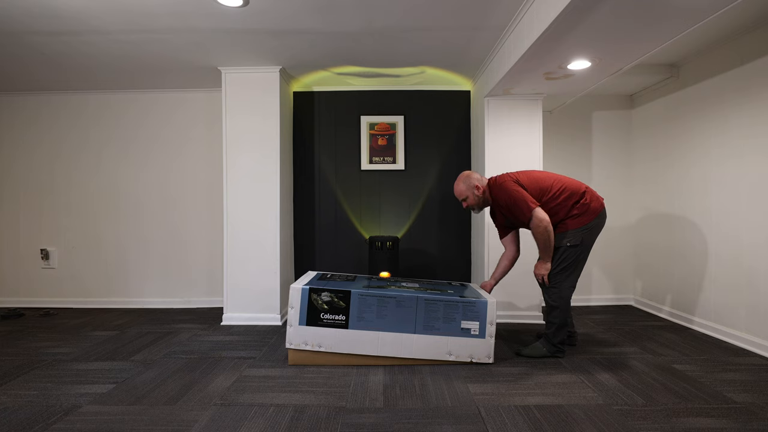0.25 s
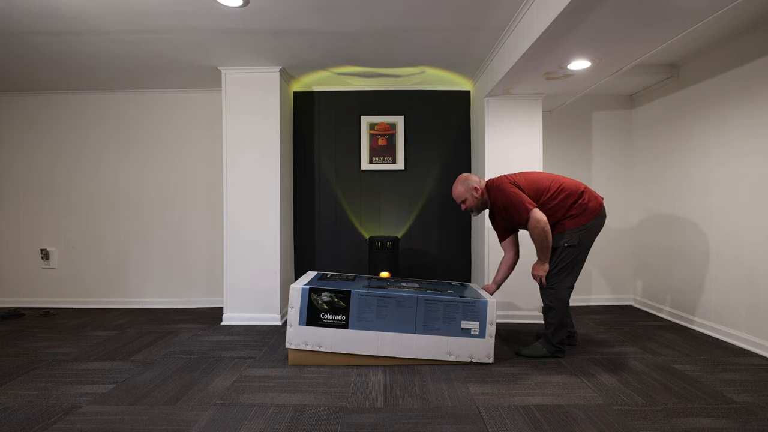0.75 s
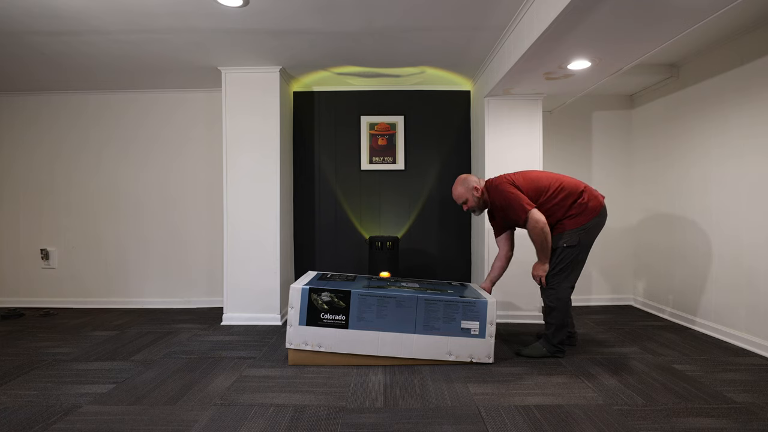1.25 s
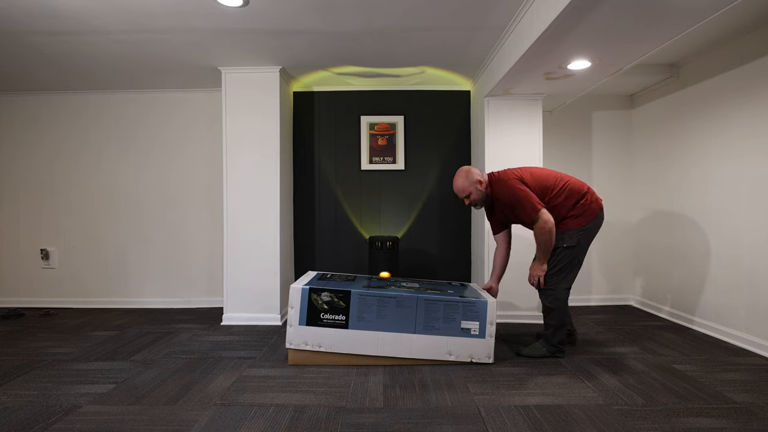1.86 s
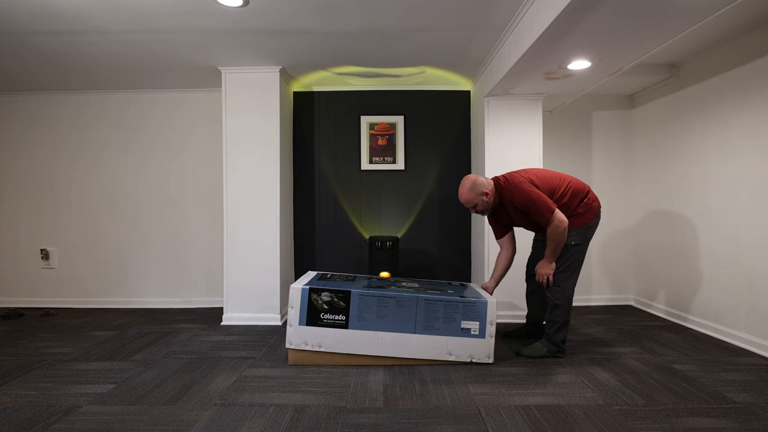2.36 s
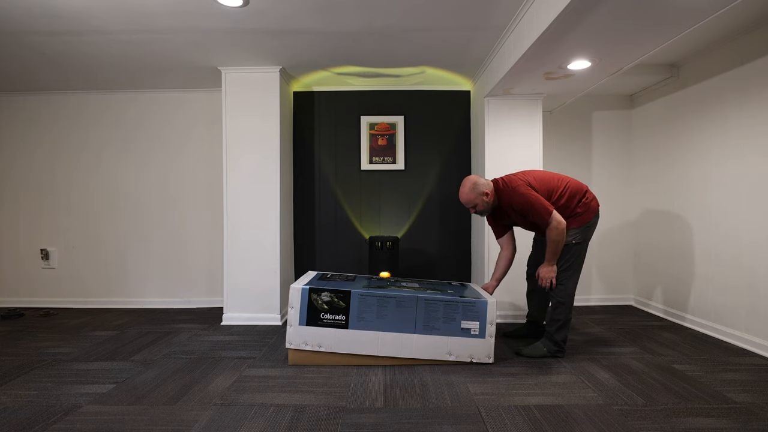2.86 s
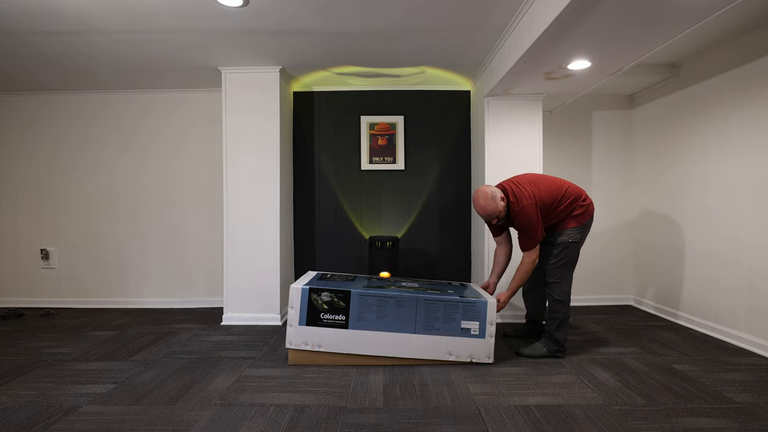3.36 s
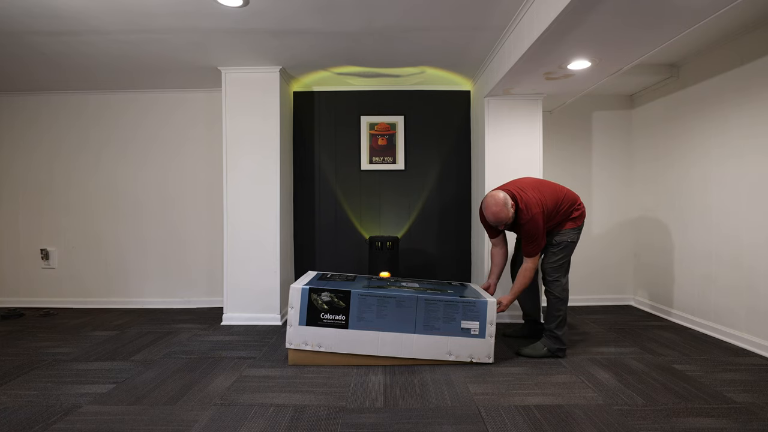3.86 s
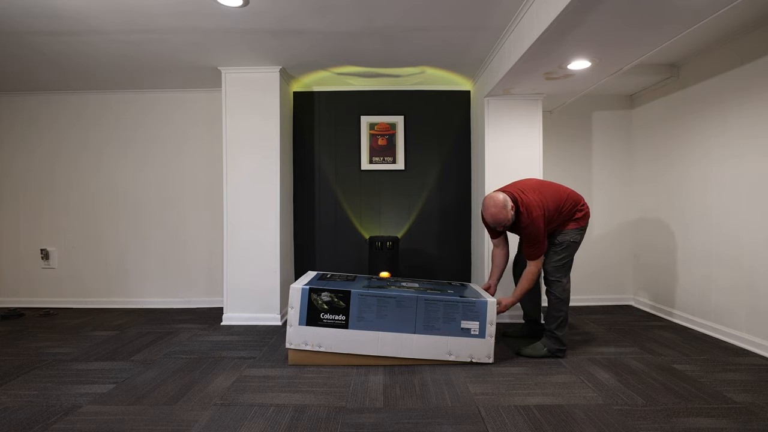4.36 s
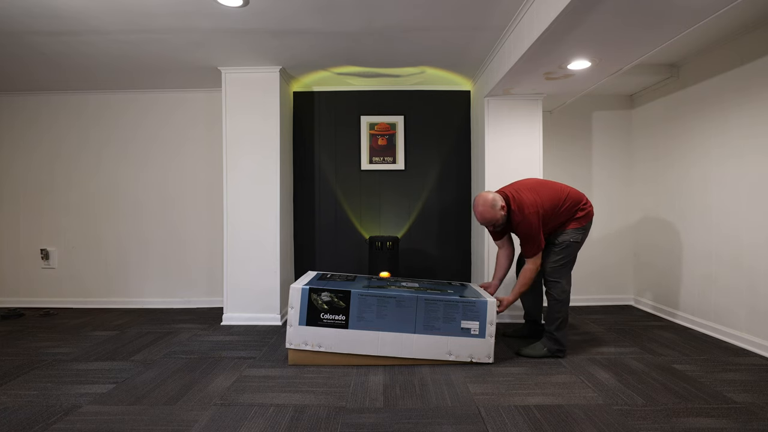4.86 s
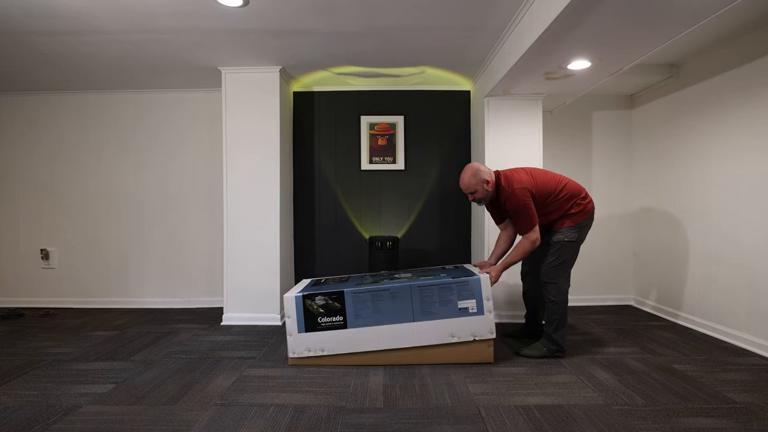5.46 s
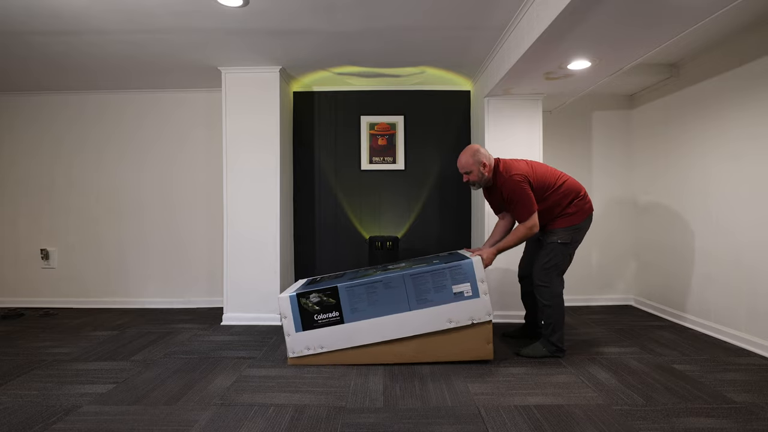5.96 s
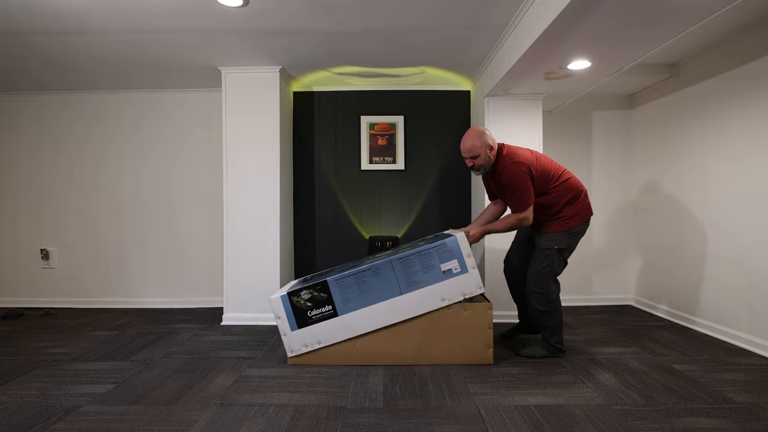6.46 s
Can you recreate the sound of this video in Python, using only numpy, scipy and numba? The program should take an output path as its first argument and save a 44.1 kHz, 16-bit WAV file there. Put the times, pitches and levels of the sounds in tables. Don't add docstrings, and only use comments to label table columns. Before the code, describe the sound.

Large cardboard box gripped, knocked and pried with irregular thuds, snaps and rustles, then its lid jerked upward in scraping, squealing strokes in a bare room.

```python
import sys
import numpy as np
from scipy import signal
from scipy.fft import rfft, irfft, next_fast_len
from scipy.io import wavfile
from scipy.ndimage import uniform_filter1d
from numba import njit

SR = 44100
rng = np.random.default_rng(int(sys.argv[2]) if len(sys.argv) > 2 else 0)


def transcribe(signal):
    frames = np.atleast_2d(signal).T
    limited = np.clip(frames, -1, 1)
    pcm = np.round(limited * 32767).astype(np.int16)
    wavfile.write(sys.argv[1], SR, pcm)


def boost_factor(decibels):
    exponent = np.asarray(decibels, float) / 20
    return 10 ** exponent


N = 295911
TIME = np.arange(N) / SR
COARSE = TIME[::64]

# (time [s], peak [dB],
# ring [Hz], box air [dB])
THUDS = [(0.151, -19, 430, -19), (0.226, -24, 452, -18), (0.309, -12.5, 404, -27), (0.348, -15, 330, -29),
         (0.415, -11, 333, -32), (0.453, -2.5, 296, -24), (0.466, -10.5, 403, -25), (0.315, -16, 125, -6.5),
         (0.719, -25, 445, -26), (0.841, -36, 258, -7), (0.971, -18.5, 97, -16), (1.077, -26.5, 216, -21),
         (1.282, -30.5, 274, -22), (1.437, -28, 400, -29), (1.685, -8, 165, -8.5), (1.69, -13, 319, -28),
         (1.706, -14, 190, -28), (1.722, -15, 210, -28), (1.821, -8.5, 209, -9), (2.085, -14.5, 237, -0.5),
         (2.228, -20, 370, -8), (2.27, -23.5, 426, -27), (2.507, -15.5, 404, -12.5),
         (2.563, -13.5, 246, -31), (2.69, -7.5, 270, -17), (3.018, -24, 275, -16), (3.066, -4.5, 243, -10),
         (3.372, -15, 292, -13), (3.528, -45, 295, 17), (3.901, -27, 131, -18), (4.041, -29.5, 122, -8),
         (4.349, -5.5, 146, -34), (4.369, -3.5, 312, -19), (4.45, -19, 360, -28), (4.635, -20.5, 334, -27),
         (4.789, -16.5, 151, -6), (4.845, -17, 231, -9.5), (4.916, -10.5, 111, -29), (5.09, -7, 99, -11),
         (5.096, -12, 240, -25), (5.135, -19, 150, -21), (5.16, -21, 135, -21), (5.376, -2, 97, -19),
         (5.51, -5.5, 174, -9.5), (5.725, -3, 143, -13), (5.75, -8.5, 124.6, -20), (5.791, -23.5, 160, 8),
         (5.921, -10.5, 108, -4.5), (6.111, -8.5, 140, -13), (6.148, -18, 132, -14), (6.374, -7.5, 102, -3),
         (5.945, -13, 185, -25), (6.12, -14, 382, -25), (6.429, -8, 220, -5), (6.458, -6, 194, -38),
         (6.49, -4.5, 410, -26), (6.52, -7, 189, -26), (6.575, -5.5, 132, -8), (6.586, -4.5, 120, -20),
         (5.385, -14.5, 283, -25), (5.606, -16, 149, -22), (6.649, -12, 171, -7)]
# (centre [Hz], width [Hz], level [dB])
PANELS = [(78.7, 12.5, -5), (132, 15.5, 2.5), (171.4, 6.9, 4.5), (258, 31, 3), (359, 160, -9.5),
          (456, 11, -3), (469, 35, -5), (767, 54, -11.5)]
# (time [s], peak [dB], hollow [dB], sharp [dB], crackle length [ms])
SNAPS = [(0.4525, -9, 8, -5.5, 4), (0.7432, -30, 6.5, -2.5, 2.8), (0.8445, -40, 17, -19, 2.4),
         (1.4355, -4.5, -2.5, -5.5, 1.5), (1.6875, -5, 4, 1, 2.5), (1.6945, -19, 0, -9, 1.2),
         (1.8367, -19, 2, -6, 2.5), (1.4415, -9, -24, 0, 1.6), (2.0806, -32, 11.5, -1, 2.7),
         (2.258, -10.5, 4, -7, 3.7), (2.6342, -15, -6, -36, 3.7), (2.689, -19, 17, -15, 4.2),
         (2.701, -31, 2, -15, 3.3), (3.0724, -13, -2, -5, 1.5), (3.0649, -14, 10, 1.5, 2.4),
         (3.3686, -16, -2, -11, 3.3), (3.5227, -27.5, -22, -22, 5.4), (3.8928, -25.5, -26, -2, 1.9),
         (3.9675, -40, 18.5, -18, 2), (4.2805, -33, -15, 2, 3), (4.37, -10, 8.5, -15, 1.7),
         (5.7259, -20, -10, -3, 3.1), (5.384, -19, 11.5, -8, 3.4), (6.4885, -12.5, 15, 2.5, 2.2),
         (6.496, -17, 9.5, -2, 2.6), (6.503, -25, -5, -4, 1.4), (6.5215, -39, 3, -7, 2.5)]
# (time [s], peak [dB], hollow [dB], sharp [dB], length [ms])
TICKS = [
    (1.8236, -13, 3, 1, 6.8),
    (4.3498, -9, 1.5, 0, 5.6),
    (4.5735, -11, -14, -13, 2.6),
    (4.8145, -39, -10, 4, 6),
    (4.8763, -31, -12, 5, 3),
    (4.9117, -28, 7, -3, 7.4),
    (5.8765, -33, -13, -8, 6.9),
]
# (time [s], peak [dB], hollow [dB], sharp [dB], length [ms])
SCUFFS = [(0.1286, -26.5, 7, -1, 19), (0.157, -21.5, 0, -5.5, 7.3), (.2947, -34, -16, -3, 4.3),
          (.367, -37, -15, 6, 3), (.616, -45, -10, 9, 8), (1.6646, -35, 1, 0, 16),
          (0.3436, -13, -28, -9, 2.8), (0.3894, -18, -17, -4, 7.8), (0.4175, -13, 5, -4, 4.2),
          (0.9083, -35.5, 0, -6, 5.8), (0.9582, -43.5, 14, -5, 39), (1.25, -39, -16, 4.5, 26),
          (1.2844, -36, -1, -11, 3.9), (1.3714, -33, 12, 6, 6.4), (1.8794, -21, 4, -3, 2.8),
          (2.2258, -24, 4, 0, 2.9), (2.3695, -25.5, 7, 2, 3.1), (2.673, -20, -3, 1.5, 8.4),
          (3.3318, -25, -10, -2, 7.9), (3.36, -32, 3, 8, 8.7), (5.5079, -23.5, -5, -13, 5.4),
          (3.0574, -12, 0, -10, 16), (3.2094, -31, -15, -7, 3.6), (3.428, -22.5, -26, -2, 3),
          (3.6182, -35, 8, -2, 2.8), (4.0525, -30.5, 2.5, -7, 7.1), (4.1094, -38, 5, 3.5, 8.5),
          (4.512, -32, 1, 14, 2.1), (4.7294, -27.5, -4, -1, 2.7), (4.7671, -31.5, -6, 7.5, 4.5),
          (6.088, -17.5, 4, -9, 12)]
# (time [s], peak [dB], hollow [dB], sharp [dB], length [ms])
TAPS = [
    (2.5083, -21.5, 7, -30, 5.7),
    (2.5616, -21, 10.5, -28, 13.5),
    (0.3106, -12.5, 4.5, -29, 6.1),
]
# (time [s], peak [dB], ring [Hz], ring time [s])
RINGS = [(.343, -17.5, 1640, 0.061), (1.686, -4.5, 1576, 0.025), (1.69, -17, 2140, 0.03),
         (3.3686, -24, 1500, 0.051), (3.6, -32, 1030, 0.016), (4.37, -11.5, 1220, 0.069),
         (4.575, -24, 3400, 0.025), (4.573, -25.5, 1420, .03), (3.336, -28, 1860, .03),
         (4.55, -35, 9000, .02), (4.575, -30, 14000, .03), (.2947, -29, 3500, .03),
         (.2947, -27, 6300, 0.033), (1.435, -13, 6840, 0.035), (1.436, -22, 1870, 0.027),
         (1.688, -16.5, 690, 0.037), (1.695, -18, 4530, 0.037), (2.258, -21, 5840, .03),
         (2.64, -17.5, 6200, .02), (3.066, -17, 5800, 0.044), (3.365, -22, 9200, 0.028),
         (4.371, -14, 940, 0.08), (6.447, -19, 6800, .03), (6.489, -23, 940, 0.055),
         (5.875, -24, 6100, .04), (5, -34, 12500, .03), (4.35, -26, 13500, .05), (4.372, -24, 13000, .03),
         (5.1, -29, 6600, 0.033), (6.51, -20, 12500, .02), (6.58, -32, 11000, .02),
         (2.365, -36, 10700, .04), (2.64, -32, 11600, .03), (2.7, -25, 4600, 0.074),
         (1.69, -17, 1160, 0.046), (1.72, -26, 720, .05), (1.835, -29, 1970, .03), (1.88, -31, 2130, .03),
         (.425, -24, 3000, 0.028), (4.38, -14.5, 494, 0.14), (5.95, -26, 6200, .03),
         (5.645, -34, 7700, .02)]
# (time [s], pressure [dB], glide [dB])
RUSTLE = [(0, -35, 2.5), (.11, -45, -3.5), (.37, -51, 8), (.63, -38.5, -6), (.75, -50, 5), (.94, -43, -4),
          (1.29, -51, 5), (1.6, -50.5, 13), (2.05, -60, 2), (2.45, -40.5, 0.5), (2.9, -47, 7),
          (3.28, -45.5, 6), (3.61, -46, 4.5), (3.94, -44.5, 2.5), (4.15, -56, 7), (4.63, -40, 2),
          (4.87, -40.5, 4), (5.05, -43.5, -1)]
# (time [s], pressure [dB], glide [dB], attack [s], release [s])
DRAGS = [(.03, -51, 9, 0.14, 0.11), (.48, -31, -2, 0.28, 0.25), (1.42, -39.5, 0.5, 0.31, 0.25),
         (1.73, -26.5, 1, 0.11, 0.27), (1.86, -35, 1.5, 0.15, 0.41), (2.28, -34.5, 5, 0.19, 0.21),
         (2.67, -27, 2, 0.07, 0.11), (2.81, -40, -4.5, 0.18, 0.063), (3.07, -34, 1.5, 0.1, 0.34),
         (3.46, -49, -11, 0.29, 0.4), (4.401, -43.5, 18, 0.16, 0.43), (4.49, -34, -10, 0.18, 0.2)]
# (time [s], speed [dB], attack [s], hold [s], release [s])
STROKES = [
    (5.094, -10.5, 0.058, 0.023, 0.086),
    (5.366, -21.5, 0.038, 0.0026, 0.12),
    (5.578, -25.5, 0.03, 0.049, 0.073),
    (5.933, -19.5, 0.058, 0.036, 0.088),
    (6.212, -17.5, 0.11, 0.027, 0.075),
    (6.42, -21.5, 0.015, .01, 0.083),
    (6.451, -17, 0.042, 0.041, 0.063),
]
# (time [s], load [dB], rub [dB], attack [s], release [s])
HEAVES = [(5.1, -7.5, -6.5, 0.077, 0.15), (5.374, -11.5, -6.5, 0.039, 0.046), (5.518, -35, -4, 0.13, 0.032),
          (5.586, -19, -5, 0.0098, 0.27), (5.73, -40, -17, 0.053, 0.15), (5.922, -18.5, -8.5, 0.1, 0.23),
          (6.12, -9.5, -12, 0.067, 0.4), (6.234, -28, -22, 0.093, 0.176),
          (6.388, -13.5, -10.5, 0.0089, 0.24), (6.49, -31, -5, 0.034, 0.035),
          (6.644, -24.5, -2, 0.14, 0.12)]
# (time [s], level [dB], hold [s], pitch [Hz], climb into the pitch [0-1])
SQUEALS = [
    (5.119, -12.5, .02, 3830, 0.2),
    (5.405, -39, 0.055, 3800, .15),
    (5.615, -21.5, 0.035, 4540, .012),
    (5.701, -44, .01, 4560, 0.09),
    (5.967, -15, 0.015, 4740, 0.26),
    (6.02, -34, .01, 4830, .01),
    (6.23, -23, 0.035, 4700, .15),
    (6.467, -28, 0.027, 4260, .15),
]
# (time [s], pitch [Hz], length [ms], peak [dB])
SQUEAKS = [
    (0.345, 1760, 5.2, -25),
    (3.331, 1342, 14, -26),
]
SKID_OVERTONES_DB = [0, -20, -5, -10, -12, -14, -17]
# (frequency [Hz], density [dB per Hz])
CREAK = [(40, -18), (80, -4), (150, -3.5), (260, 1), (450, -8.5), (800, -14.5)]
RUB = [(300, 1), (500, 0), (1000, 1), (1600, -5), (2500, -12), (4000, -12)]
HISS = [(1180, -5), (2000, -5.5), (2400, -3.5), (2640, -2.5), (3060, -3.5), (3910, -2), (5490, -1),
        (6760, -5), (11800, -11.5), (16000, -22)]
RUMBLE = [(15, -1), (30, -2.5), (60, -3), (120, 1.5), (250, -7.5), (450, -17), (800, -55)]
# (frequency [Hz], decay time t60 [s], level [dB])
ROOM = [(45, 0.53, -7.5), (159, 0.34, -1.5), (404, 0.27, 3.5), (1020, 0.57, 1), (3200, 0.32, 2),
        (8060, 0.25, 4), (12200, 0.092, 0)]
# (frequency [Hz], density [dB per Hz])
AIR = [(15, -51), (25, -5), (87, -54), (108, -10.5), (277, -14), (1040, -49), (2050, -21), (2280, -36),
       (2760, -38), (16000, -37)]

PATCHY_DB, STROKE_DB = 3, 2.8
CREEP_DB, LID_FREE_S = -41, 5.02
FIRST_WALL_MS = 5
THUD_ROOM_DB = -3


def level(x, db):
    return x * boost_factor(db) / np.sqrt(np.mean(x ** 2))


def peak(x, db):
    return x * boost_factor(db) / np.max(np.abs(x))


def band(x, hz, width):
    return signal.lfilter(*signal.iirpeak(hz, hz / width, fs=SR), x)


def between(x, lo_hz, hi_hz):
    return signal.sosfilt(signal.butter(4, [lo_hz, hi_hz], "band", fs=SR, output="sos"), x)


@njit
def moving_band(x, hz, width):
    y, b, l = np.empty(len(x)), 0., 0.
    for i in range(len(x)):
        g, k = np.tan(np.pi * hz[i] / SR), width / hz[i]
        v = (b + g * (x[i] - l)) / (1 + g * (g + k))
        b, l, y[i] = 2 * v - b, l + 2 * g * v, k * v
    return y


def colour(x, points):
    hz, db = np.transpose(points)
    size = next_fast_len(N)
    bins = np.arange(1, size // 2 + 2) * SR / size
    gain = boost_factor(np.interp(np.log(bins), np.log(hz), db, left=-90, right=-90))
    return level(irfft(rfft(x, size) * gain, size)[:N], 0)


def add(out, s, sound):
    i = int(s * SR)
    out[i:i + len(sound)] += sound[:N - i]


def fine(gain):
    return np.interp(TIME, COARSE, gain)


def swell(s, db, attack_s, hold_s, release_s):
    before = np.maximum(s - COARSE, 0) / attack_s
    after = np.maximum(COARSE - s - hold_s, 0) / release_s
    return boost_factor(db - np.minimum(30 * (before + after), 200))


def walk(rate):
    k = int(SR / rate)
    return uniform_filter1d(np.repeat(rng.standard_normal(N // k + 1), k), k)[:N]


def grit(spread_db, flicker_db, rate):
    slips = rng.standard_normal(N)
    size_db = spread_db * np.minimum(rng.exponential(size=N), 5)
    return slips * boost_factor(size_db + flicker_db * walk(rate))


def contact(t, ms, rise):
    span = ms / 1000
    return (1 - np.exp(-t / (rise * span))) * np.exp(-t / span)


def swing(t, hz, t60, ms):
    return peak(np.sin(2 * np.pi * hz * t) * (1 - np.exp(-t * 1000 / ms)) * boost_factor(-60 * t / t60), 0)


def thuds():
    events, push_ms = THUDS, 3.46
    out, t = np.zeros(N), np.arange(8192) / SR
    force = rng.standard_normal((len(events), len(t))) * contact(t, push_ms, rise=0.41)
    push = between(force, 31, 754)
    boxes = sum((-1) ** k * boost_factor(d) * band(push, f, w) for k, (f, w, d) in enumerate(PANELS))
    box_air = swing(t, 79, 0.1, push_ms)
    for (s, db, hz, air_db), box in zip(events, boxes):
        t60 = 0.058 * (250 / hz) ** 0.53
        struck = between(swing(t, hz, t60, .5 * push_ms), 0.53 * hz, 2300)
        others = peak(box, -1.5 + 3 * np.log2(hz / 300))
        add(out, s - .001, boost_factor(db - 5.5) * (struck + others + boost_factor(air_db + 3.5) * box_air))
    return out


def cracks(table, ring_hz, edge_hz, rise, spread_db):
    out, t = np.zeros(N), np.arange(4096) / SR
    noise = rng.standard_normal((len(table), 2, len(t)))
    force = [contact(t, row[-1], rise) for row in table]
    bursts = noise[:, 0] * boost_factor(spread_db * noise[:, 1]) * force
    crackle = between(bursts, 890, edge_hz)
    hollow = between(bursts, 448, 1680)
    sharp = band(between(bursts, 5200, 13400), 8070, 3300)
    for k, (s, db, hollow_db, sharp_db, _) in enumerate(table):
        hz = ring_hz * 2 ** (noise[k, 1, -1] / 8)
        bright = peak(crackle[k], 0.091) + peak(band(bursts[k], hz, 0.52 * hz), 0.69)
        add(out, s - .001, boost_factor(db - 5.0) * (bright + peak(hollow[k], hollow_db) + peak(sharp[k], sharp_db)))
    return out


def snaps():
    creases = cracks(SNAPS, ring_hz=1540, edge_hz=6100, rise=0.17, spread_db=3.0)
    nails = cracks(TICKS, ring_hz=3550, edge_hz=6600, rise=0.43, spread_db=-1.5)
    palms = cracks(SCUFFS, ring_hz=1760, edge_hz=6750, rise=0.24, spread_db=6.0)
    knuckles = cracks(TAPS, ring_hz=3670, edge_hz=5000, rise=0.13, spread_db=2.0)
    return creases + nails + palms + knuckles


def rings():
    out, t = np.zeros(N), np.arange(8192) / SR
    for s, db, hz, t60 in RINGS:
        rattle = rng.standard_normal(len(t)) * boost_factor(-60 * t / max(t60, .02))
        width = 0.16 * hz
        add(out, s, peak(band(band(rattle, hz, width), hz, 2 * width), db))
    return out


def rustle():
    s, pressure, glides = np.transpose(RUSTLE)
    pressure_db = np.interp(COARSE, s, pressure, left=-120, right=-120)
    glide_db = np.interp(COARSE, s, glides)
    creak, rub, hiss = boost_factor(pressure_db - glide_db), boost_factor(pressure_db), boost_factor(pressure_db + glide_db)
    for s, db, glide, attack_s, release_s in DRAGS:
        drag = swell(s, db, attack_s, 0, release_s)
        creak, rub, hiss = creak + drag * boost_factor(-glide), rub + drag, hiss + drag * boost_factor(glide)
    creaking = colour(grit(4.7, PATCHY_DB, 25.15), CREAK) * fine(creak) * boost_factor(-3)
    rubbing = colour(grit(6.1, PATCHY_DB, 30.02), RUB) * fine(rub) * boost_factor(-7.5)
    hissing = colour(grit(1.9, PATCHY_DB, 35), HISS) * fine(hiss) * boost_factor(-16)
    return creaking + rubbing + hissing


def slide():
    creep = boost_factor(CREEP_DB) * (COARSE > LID_FREE_S)
    speed = creep + sum(swell(*row) for row in STROKES)
    loads = [swell(s, db, a, 0, r) for s, db, _, a, r in HEAVES]
    edge_load = creep * boost_factor(4.0) + sum(g * boost_factor(row[2]) for g, row in zip(loads, HEAVES))
    rub = colour(grit(5.6, STROKE_DB, 40), RUB) * fine(edge_load)
    rumble = colour(grit(5.2, PATCHY_DB, 25), RUMBLE) * fine(creep * boost_factor(1.5) + sum(loads))
    hiss = colour(grit(4.6, STROKE_DB, 120), HISS) * fine(speed)
    return boost_factor(-8.0) * (hiss + rub + rumble)


def squeal():
    late_s, climb_s, width_hz = 0.055, 0.034, 330.
    gain = boost_factor(CREEP_DB - 17) * (COARSE > LID_FREE_S)
    hz = np.interp(TIME, *np.transpose(sorted((row[0], row[3]) for row in SQUEALS)))
    flat = np.zeros(N)
    for s, db, hold_s, _, climb in SQUEALS:
        gain = gain + swell(s, db - 6, late_s, hold_s, .06)
        flat += climb * np.clip((s - TIME) / climb_s, 0, 1) * (TIME > s - late_s)
    hz = hz * (1 - flat)
    singing = moving_band(moving_band(grit(3.8, STROKE_DB, 120), hz, width_hz), hz, width_hz)
    return level(singing, -7.5) * fine(gain)


def squeaks():
    out, t = np.zeros(N), np.arange(4096) / SR
    for s, hz, ms, db in SQUEAKS:
        wobble = uniform_filter1d(rng.standard_normal(len(t)), size=64)
        turn = 2 * np.pi * np.cumsum(hz * (1 + .22 * wobble)) / SR
        overtones = enumerate(SKID_OVERTONES_DB, start=1)
        tone = sum(boost_factor(d) * np.sin(k * turn) * (k * hz < 12000) for k, d in overtones)
        add(out, s, boost_factor(db) * tone * np.sin(np.pi * np.minimum(t * 1000 / ms, 1)) ** .5)
    return out


def near_walls(x):
    t = np.arange(SR // 8) / SR
    echoes = between(rng.standard_normal(len(t)), 248, 10200) * np.exp(-t * 1000 / 4.9)
    echoes = echoes * (t > FIRST_WALL_MS / 1000)
    return signal.fftconvolve(x, echoes * boost_factor(-5) / np.sqrt(np.sum(echoes ** 2)))[:N]


def room(x):
    hz, t60, db = np.transpose(ROOM)
    size = 5 * 2 ** 16
    sound, noise = rfft(x, size), rfft(rng.standard_normal(size))
    octaves = np.log2(np.arange(1, size // 2 + 2) * SR / size)
    field = np.zeros_like(sound)
    for centre in np.arange(5, 14, 1 / 4):
        step = 2 ** max(int(13.6 - centre), 0)
        bins = size // step // 2 + 1
        share = np.clip(1 - 4 * np.abs(octaves[:bins] - centre), 0, 1)
        keep = boost_factor(-2 * 60 * step / SR / np.interp(centre, np.log2(hz), t60))
        energy = irfft(sound[:bins] * np.sqrt(share)) ** 2
        stored = signal.lfilter([1 - keep], [1, -keep], energy)
        echoes = level(irfft(noise[:bins] * share), 0.5 + np.interp(centre, np.log2(hz), db))
        field[:bins] += rfft(np.sqrt(stored) * echoes)
    lag = int(FIRST_WALL_MS * SR / 1000)
    return x + np.r_[np.zeros(lag), irfft(field)[:N - lag]]


def ringing_room(x):
    t = np.arange(SR // 2) / SR
    tail = between(rng.standard_normal(len(t)), 200, 8600) * boost_factor(-60 * t / 0.38)
    tail = tail * (t > FIRST_WALL_MS / 1000)
    return x + signal.fftconvolve(x, tail * boost_factor(-1) / np.sqrt(np.sum(tail ** 2)))[:N]


def air():
    hum = level(band(rng.standard_normal(N), 80, 8.4), -51)
    return colour(rng.standard_normal(N), AIR) * boost_factor(-52) + hum


def scene():
    noisy = snaps() + rustle() + slide()
    panels = thuds()
    pitched = squeaks() + squeal() + rings()
    feed = boost_factor(THUD_ROOM_DB)
    heard = room(noisy + feed * panels) + (1 - feed) * panels + ringing_room(pitched)
    return (heard + near_walls(noisy + panels + pitched) + air())[None]


def band_limit(x):
    return signal.sosfilt(signal.butter(12, 16260, fs=SR, output="sos"), x)


def record(dry):
    lift = 0.22 * band(dry, 4210, 640) + 0.23 * band(dry, 6490, 760)
    dip = 0.52 * band(dry, 5440, 2850)
    heard = dry + lift - dip
    heard = signal.sosfilt(signal.butter(2, 26, "high", fs=SR, output="sos"), heard)
    heard = np.clip(heard, -.93, .93)
    heard = signal.sosfilt(signal.ellip(8, .2, 60, 15850, fs=SR, output="sos"), heard)
    return band_limit(heard)


dry = scene()
out = record(dry)
transcribe(out)
```